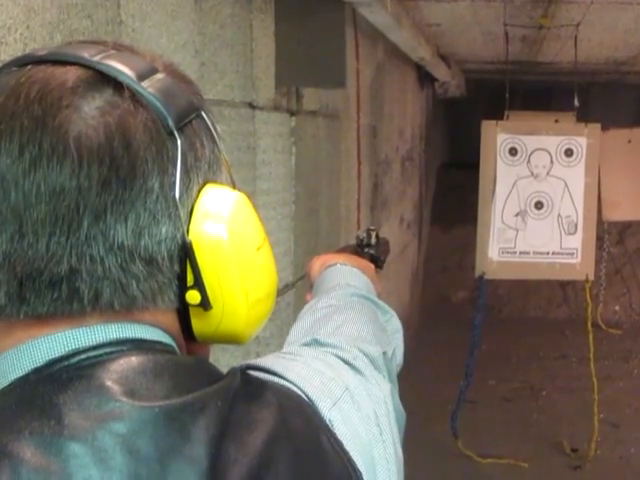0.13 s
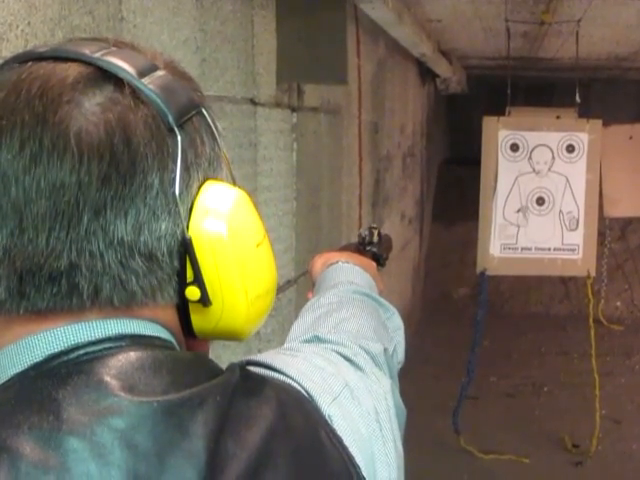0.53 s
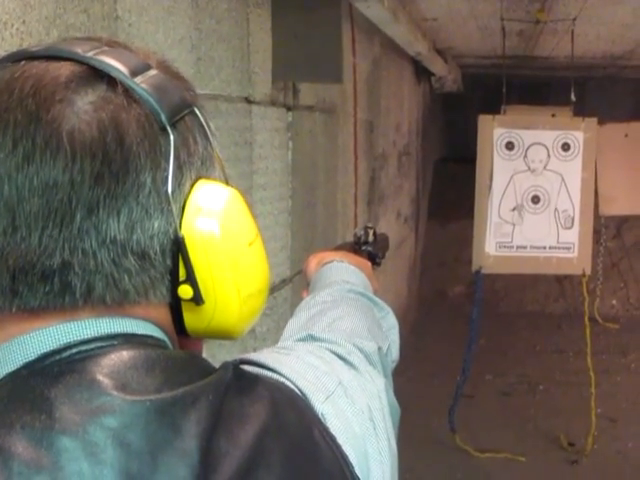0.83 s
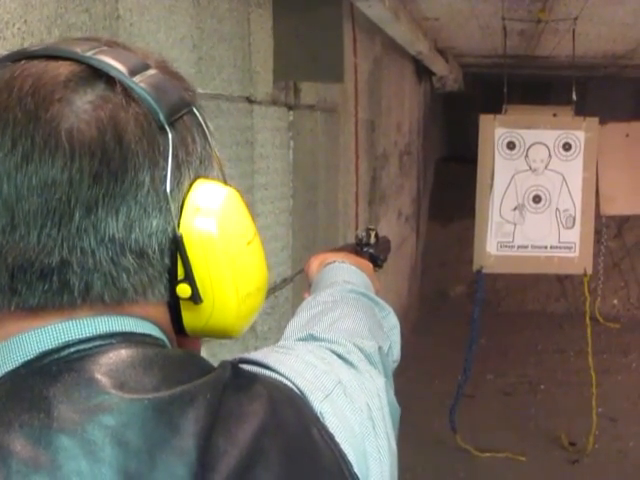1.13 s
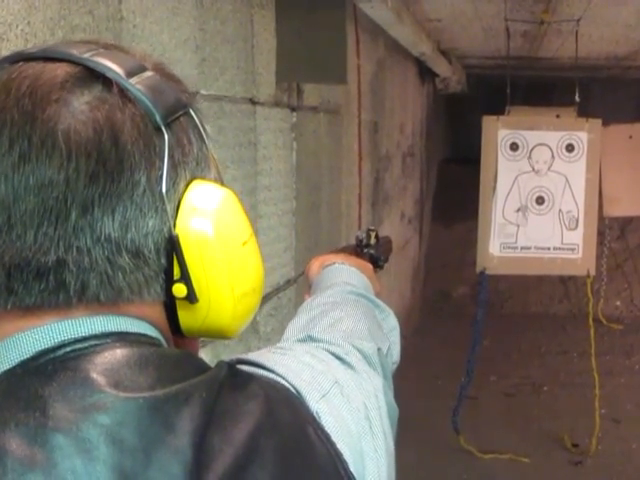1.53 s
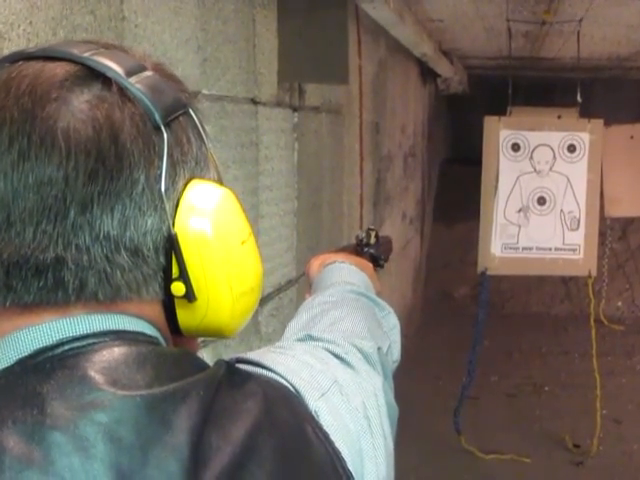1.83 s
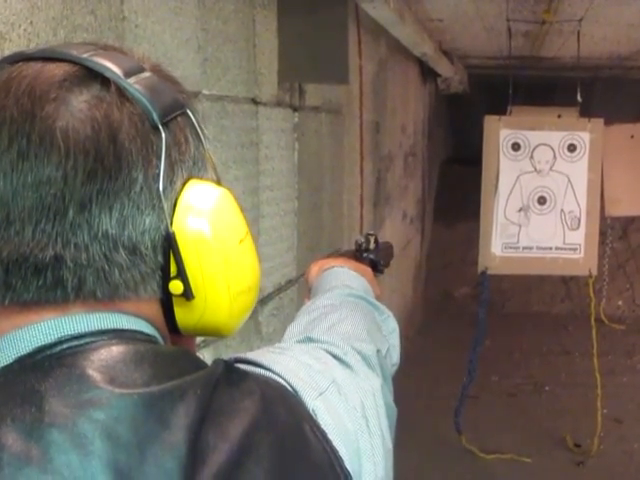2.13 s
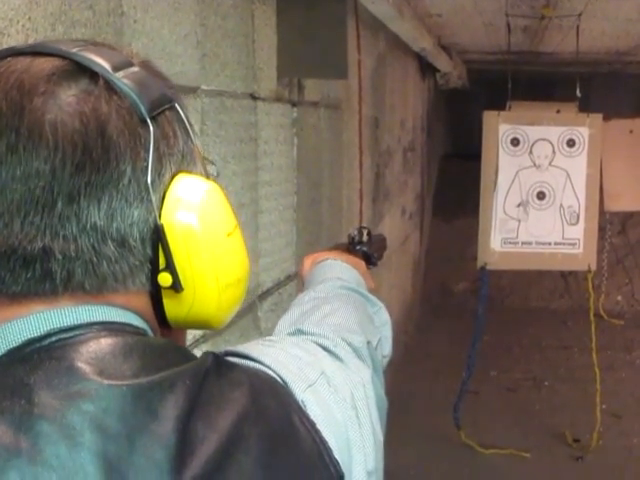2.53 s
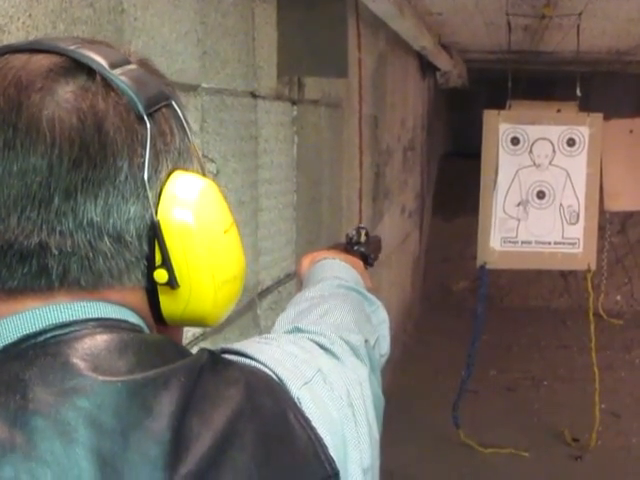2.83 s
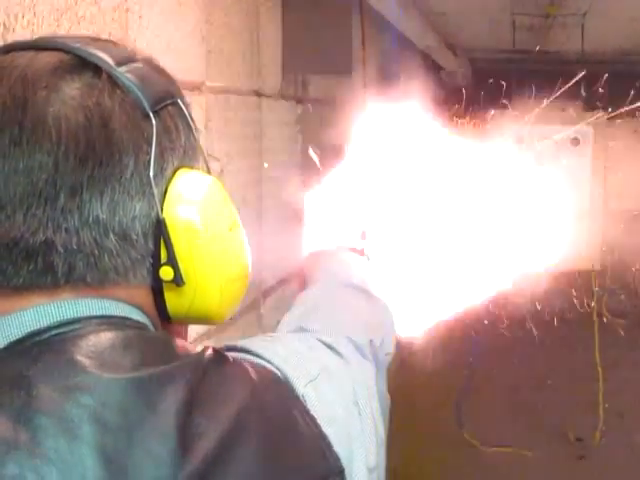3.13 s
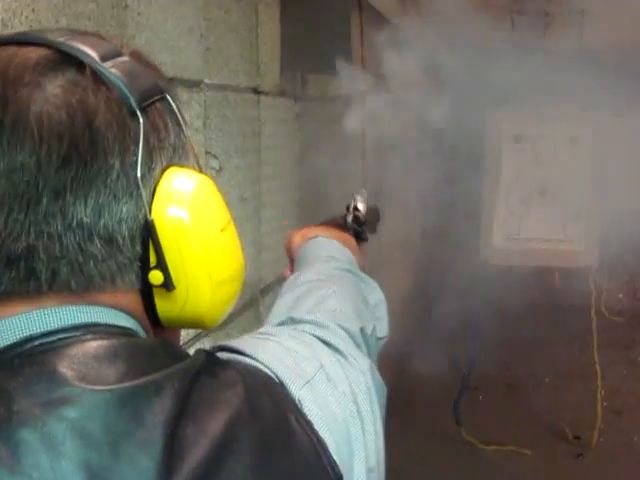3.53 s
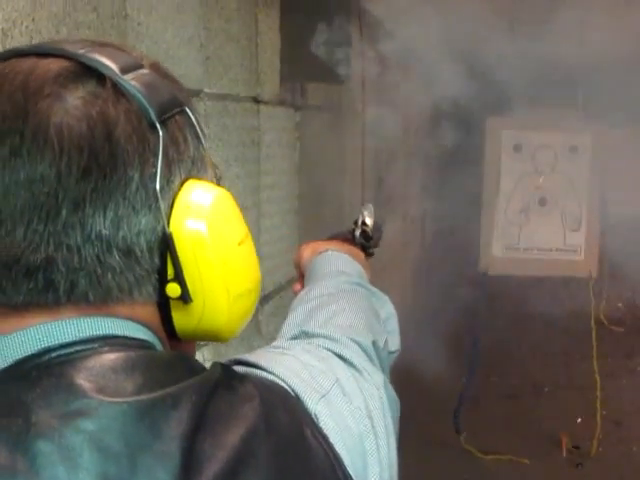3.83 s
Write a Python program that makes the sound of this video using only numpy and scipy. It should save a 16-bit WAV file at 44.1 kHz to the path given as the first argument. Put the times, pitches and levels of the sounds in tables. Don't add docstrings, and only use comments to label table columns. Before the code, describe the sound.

A flintlock pistol fires once in a long concrete range. Until 3.0 s there is only quiet low ventilation hum, hiss and a faint high camera whine. At 3.05 s flint scrapes steel with a metallic click, and priming hisses briefly. At 3.2 s a hard, overloaded bang hits; the level ducks sharply, then a far-wall slap near 3.4 s and deep boom swell back, with small crackly buzzes from 3.6 to 4 s.

```python
import sys
import numpy as np
from scipy import signal
from scipy.fft import rfft, irfft, next_fast_len
from scipy.io import wavfile
from scipy.ndimage import uniform_filter1d, map_coordinates

SR = 44100
rng = np.random.default_rng(int(sys.argv[2]) if len(sys.argv) > 2 else 0)


def linear_from_db(decibels):
    return 10 ** (np.asarray(decibels, float) / 20)


def generate_wav(signal):
    frames = np.transpose(np.atleast_2d(signal))
    scaled = np.clip(frames, -1, 1) * 32767
    pcm = np.round(scaled).astype(np.int16)
    wavfile.write(sys.argv[1], SR, pcm)


N = 176400
CLOCK_S = np.arange(N) / SR
VENT_S, SHOT_S = 3.1932, 3.1994


def unit(x):
    return x / np.sqrt(np.mean(x ** 2) + 1e-20)


def along(points, hz):
    f, v = np.transpose(points)
    return np.interp(np.log(hz + 1), np.log(f + 1), v)


def curve(rows):
    s, v = np.transpose(rows)
    return np.interp(CLOCK_S, s, v)


def since(s):
    t = CLOCK_S - s
    return np.maximum(t, 0), t >= 0


def filtered(x, response):
    m = next_fast_len(N + SR // 2)
    return irfft(rfft(x, m) * response(np.fft.rfftfreq(m, 1 / SR)), m)[..., :N]


def noise(spectrum):
    return unit(filtered(rng.standard_normal(N), lambda hz: linear_from_db(along(spectrum, hz))))


def peak(hz, width_hz):
    return lambda f: 1j * f * width_hz / (hz * hz - f * f + 1j * f * width_hz)


def hum(hz, width_hz):
    return unit(filtered(rng.standard_normal(N), lambda f: peak(hz, width_hz)(f) ** 2))


def dying(spectrum, t60):
    hz, t, z = signal.stft(noise(spectrum), SR, nperseg=1024, noverlap=896)
    z = z * linear_from_db(-60 * np.maximum(t - SHOT_S, 0) / along(t60, hz)[:, None])
    return signal.istft(z, SR, nperseg=1024, noverlap=896)[1][:N] * since(SHOT_S)[1]


# start in seconds, level in dB.
BLAST_FRONTS = [
    (3.1994, 37),
    (3.2008, 38),
    (3.2043, 31),
    (3.21, 25),
    (3.212, 25),
    (3.222, 22),
    (3.226, 22),
]


def muzzle_blast():
    blast_s = 0.00036
    front = np.zeros(N)
    for s, db in BLAST_FRONTS:
        t, on = since(s)
        front += linear_from_db(db) * on * (1 - t / blast_s) * np.exp(-t / blast_s)
    barrel = peak(hz=710, width_hz=670)
    bench = peak(hz=310, width_hz=130)
    return filtered(front, lambda f: 0.086 + barrel(f) + linear_from_db(4) * bench(f))


# frequency in Hz, level in dB per Hz.
VENT_COLOUR = [(200, -20.5), (1000, -6.5), (2500, 2.5), (5000, 0), (7500, -9.5), (10500, -3.5)]


def vent_spit():
    length_s, t60_s = .0065, .03
    t, on = since(VENT_S)
    swell_db = 6.6 * np.minimum(t / length_s, 1)
    fall_db = 60 * np.maximum(t - length_s, 0) / t60_s
    return linear_from_db(-1.5 + swell_db - fall_db) * on * noise(VENT_COLOUR)


# frequency in Hz, T60 in seconds.
BOOTH_T60 = [(200, .1), (1000, 0.11), (4000, .15), (10000, 0.36)]


def booth():
    colour_hz_db = [(100, -14.5), (300, 2), (1200, -3), (4000, -16.5), (10000, -22)]
    return linear_from_db(14) * dying(colour_hz_db, BOOTH_T60)


# start in seconds, level in dB, ring in Hz.
FLINT = [
    (3.0467, -16.5, 3680),
    (3.052, -17, 3400),
    (3.0545, -19.5, 2920),
    (3.057, -17, 2420),
    (3.0609, -21.5, 1750),
    (3.0684, -26.5, 1610),
]
# frequency in Hz, level in dB, T60 in seconds.
LOCK_MODES = [(1604, -10, 0.088), (2200, -22, .05), (3060, -14, 0.028), (4330, -9, .025),
              (5280, -4.5, 0.029), (9630, -10, .03), (10320, -11, .03)]


def flint_on_steel():
    out, t = np.zeros(N), np.arange(SR // 8) / SR
    for s, db, ring_hz in FLINT:
        ring = linear_from_db(-60 * t / 0.015) * np.sin(2 * np.pi * ring_hz * t)
        body = np.zeros(len(t))
        for hz, mode_db, t60_s in LOCK_MODES:
            strike_db = mode_db + rng.normal(0, 3.5) - 9
            body += linear_from_db(strike_db - 60 * t / t60_s) * np.sin(2 * np.pi * hz * t)
        crack = linear_from_db(-4 - 60 * t / .006) * np.diff(rng.standard_normal(len(t) + 1)) / 2
        out[round(s * SR):][:len(t)] += linear_from_db(db) * (ring + body + crack)
    return out


# time in seconds, level in dB.
PAN_LEVEL = [
    (3.04, -60.5),
    (3.047, -30),
    (3.056, -23),
    (3.078, -34.5),
    (3.11, -41),
    (3.18, -47),
    (3.192, -24),
]
# frequency in Hz, level in dB per Hz.
PAN_COLOUR = [(200, -35), (700, -11.5), (1600, -1.5), (3800, -1.5), (5500, -5), (9000, -7.5), (11000, -7.5)]


def pan_hiss():
    grain = linear_from_db(2.5 * unit(uniform_filter1d(rng.standard_normal(N), size=40)))
    burning = since(PAN_LEVEL[0][0])[1] & ~since(VENT_S)[1]
    return linear_from_db(curve(PAN_LEVEL)) * burning * unit(grain * noise(PAN_COLOUR))


# frequency in Hz, level in dB per Hz.
TAIL_COLOUR = [(100, -6), (200, -0.5), (500, -5.5), (1000, -12), (2500, -17.5), (5000, -29.5),
               (8000, -41.5), (11000, -44)]
# frequency in Hz, T60 in seconds.
TAIL_T60 = [(100, 2.63), (300, 1.71), (600, 1.24), (1500, 1.18), (3000, 1.02), (6000, .8), (10000, 0.61)]
# time in seconds, level in dB over the tail, length in seconds.
SLAPS = [
    (3.296, 1, 0.038),
    (3.398, 9.5, 0.024),
    (3.58, 3, 0.034),
]


def tunnel_tail():
    slap_db = sum(db * np.exp(-((CLOCK_S - s) / length_s) ** 2) for s, db, length_s in SLAPS)
    clump_db = 2 * map_coordinates(rng.standard_normal(300), [CLOCK_S * 60])
    tail = dying(TAIL_COLOUR, TAIL_T60)
    highs = filtered(tail, lambda f: f * f / (f * f + 900 ** 2))
    build = 1 - np.exp(-since(SHOT_S)[0] / 0.01)
    return linear_from_db(16) * (tail + highs * (linear_from_db(slap_db + clump_db) - 1)) * build


# frequency in Hz, level in dB, T60 in seconds, side of the node (sign).
TUNNEL_MODES = [(30, 18.5, 2.04, -1), (48.1, 7, 1.9, 1), (55.6, 18.5, 1.82, 1), (64.2, 11.5, 2.8, 1),
                (72.9, 19.5, 2.73, -1), (78.9, 12.5, 1.8, 1), (83.1, 13.5, 2.75, 1), (91.6, 14, 2.16, 1),
                (109.7, 5, 2.34, 1), (123.2, 9.5, 3.1, -1), (132.4, 9.5, 1.5, -1), (153.6, 11.5, 2.4, 1),
                (225.3, 5.5, 2.2, 1), (230.7, 5, 2.1, -1)]


def tunnel_boom():
    t = since(SHOT_S)[0]
    boom = np.zeros(N)
    for hz, db, t60_s, side in TUNNEL_MODES:
        boom += np.sign(side) * linear_from_db(db - 60 * t / t60_s) * np.cos(2 * np.pi * hz * t)
    return boom * (1 - np.exp(-t / 0.073))


def steel_ring():
    t = since(SHOT_S)[0]
    return linear_from_db(-3 - 60 * t / 0.95) * np.sin(2 * np.pi * 3700 * t)


# frequency in Hz, level in dB per Hz.
AIR_COLOUR = [(20, -7.5), (35, -6.5), (150, -14), (1000, -20), (2500, -25), (4800, -33), (7000, -41),
              (11000, -44.5)]
# frequency in Hz, width in Hz, level in dB.
DUCTS = [(32.3, 16, -63.5), (88, 25, -57), (112.4, 10, -51)]


def ventilation():
    swell = linear_from_db(3.3 * map_coordinates(rng.standard_normal(20), [CLOCK_S * 3]))
    ducts = sum(linear_from_db(db - 1.5) * hum(hz, width_hz) for hz, width_hz, db in DUCTS)
    return linear_from_db(-47.5) * noise(AIR_COLOUR) + swell * ducts


def scene():
    shot = muzzle_blast() + vent_spit() + booth()
    lock = flint_on_steel() + pan_hiss()
    tunnel = tunnel_tail() + tunnel_boom() + steel_ring()
    return (shot + lock + tunnel + ventilation())[None]


# time in seconds, gain in dB.
GAIN = [
    (3.19, 1.5),
    (3.2, -20),
    (3.23, -40.5),
    (3.265, -42.5),
    (3.3, -33.5),
    (3.45, -30.5),
    (3.7, -24),
    (3.93, -17),
    (4, -16),
]


def camera_gain_db():
    return curve(GAIN)


# time in seconds, peak in dB.
CRESTS = [(3.5757, -44.5), (3.5953, -41.5), (3.6256, -43), (3.6674, -50.5), (3.679, -41.5), (3.6994, -48.5),
          (3.7394, -43), (3.8057, -39.5), (3.8551, -39), (3.9211, -36)]


def gain_buzz(x):
    step_hz, half_s = 2200, 0.003 / 2
    uneven = rng.standard_normal(N)[(CLOCK_S * step_hz).astype(int)]
    saw = uniform_filter1d((CLOCK_S * step_hz) % 1 - .5, size=3)
    steps = sum(linear_from_db(db + 8.5) * np.exp(-((CLOCK_S - s - half_s) / half_s) ** 2) for s, db in CRESTS)
    creep = linear_from_db(-27.5) * uniform_filter1d(x, size=64) ** 2 * (CLOCK_S > CRESTS[0][0] - .2)
    return saw * (steps * (1 + .35 * uneven) + creep * uneven)


# frequency in Hz, level in dB, polarity (sign).
WHINE = [(7762, -85.5, -1), (7900, -81.5, -1), (7852, -72.5, 1), (7882, -73.5, 1), (8000, -81, -1),
         (8000, -85.5, -1)]


def camera_noise(gain_db):
    hiss = linear_from_db(-59.5) * rng.standard_normal(N)
    whine = sum(np.sign(side) * linear_from_db(db + 3) * np.sin(2 * np.pi * hz * CLOCK_S) for hz, db, side in WHINE)
    return linear_from_db(0.35 * gain_db) * hiss + linear_from_db(.65 * gain_db) * whine


# frequency in Hz, level
# in dB.
BAND = [(5000, -0.5), (6050, -9.5), (6280, -45), (6560, -11.5), (7600, -1.5), (10950, 0), (11300, -44.5),
        (12000, -60)]


def notched_band(x):
    return filtered(x, lambda hz: linear_from_db(along(BAND, hz)))


def low_pass(x):
    return signal.sosfilt(signal.butter(12, 11770, fs=SR, output="sos"), x)


def record(dry):
    gain_db = camera_gain_db()
    x = dry * linear_from_db(gain_db)
    x = x + gain_buzz(x) + camera_noise(gain_db)
    x = notched_band(x)
    hardness = 16
    x = x / (1 + np.abs(x) ** hardness) ** (1 / hardness)
    return low_pass(x)


dry = scene()
out = record(dry)
generate_wav(out)
```